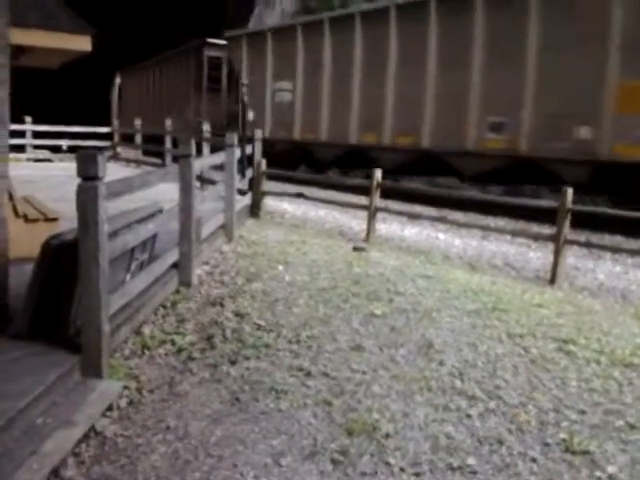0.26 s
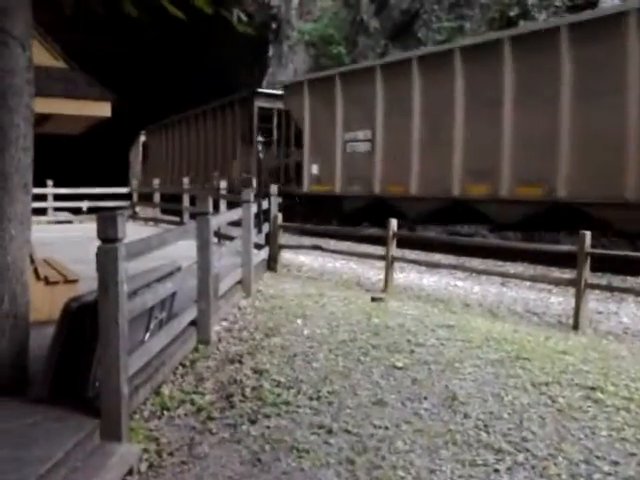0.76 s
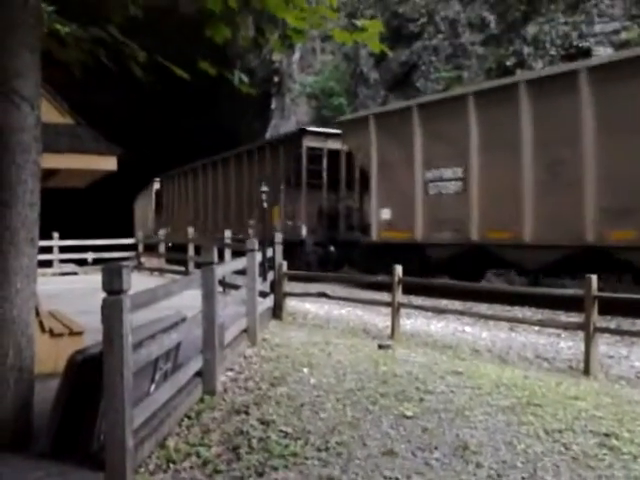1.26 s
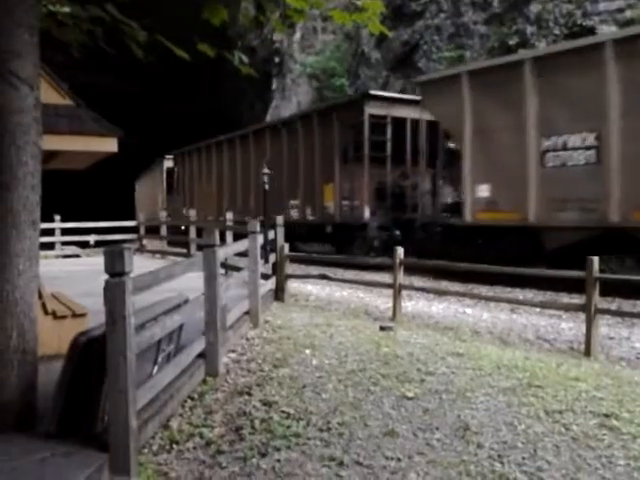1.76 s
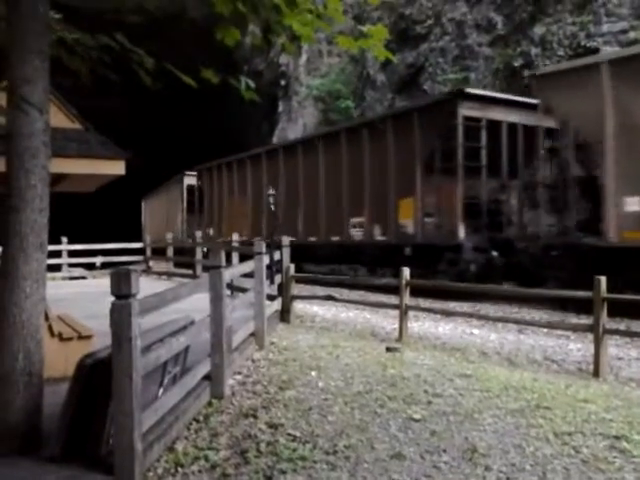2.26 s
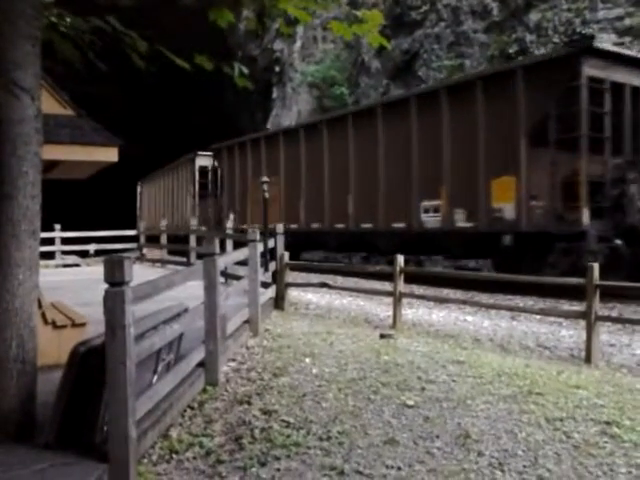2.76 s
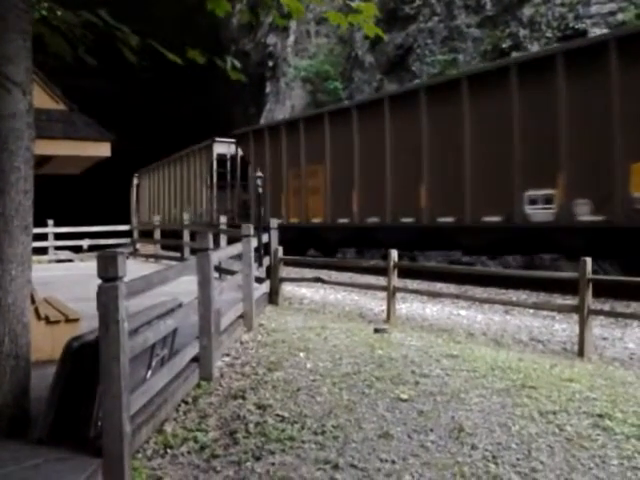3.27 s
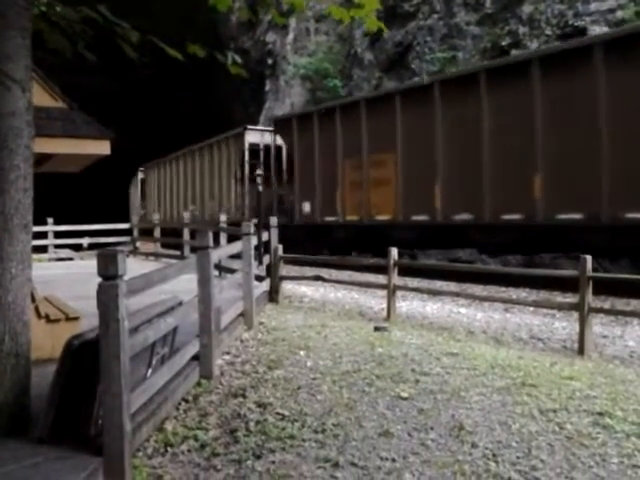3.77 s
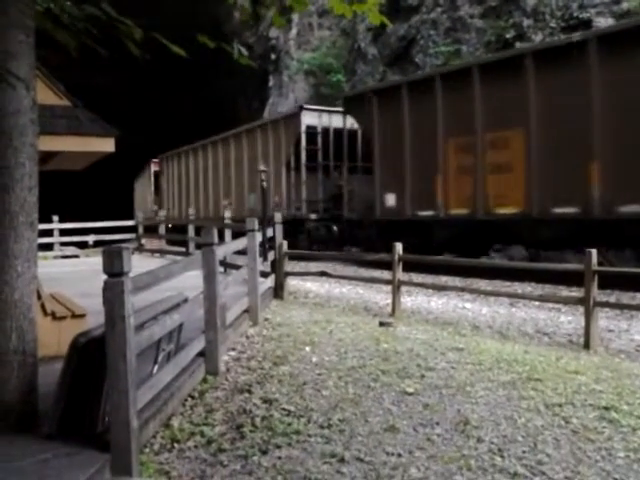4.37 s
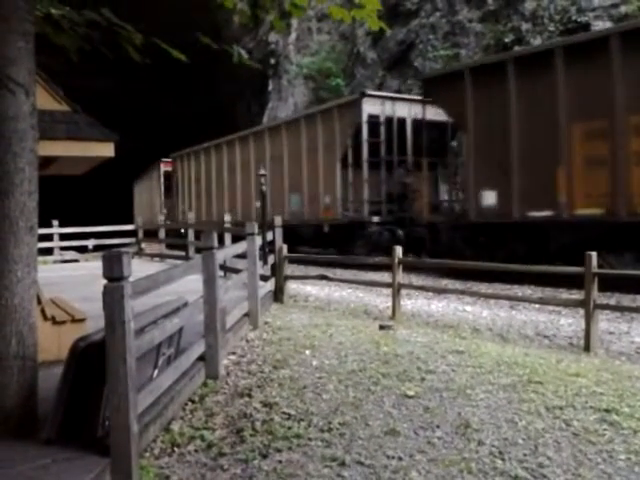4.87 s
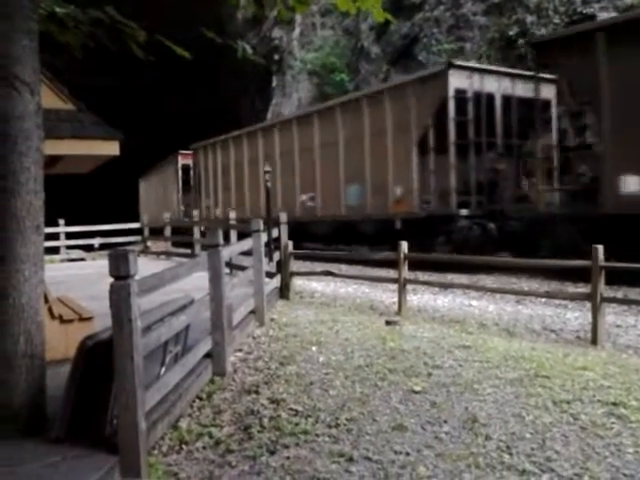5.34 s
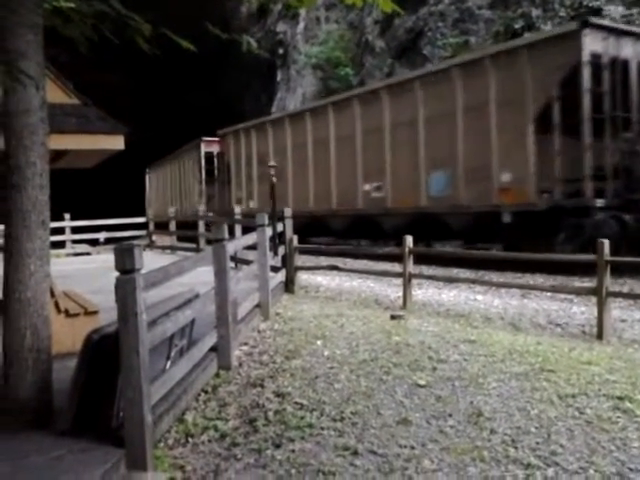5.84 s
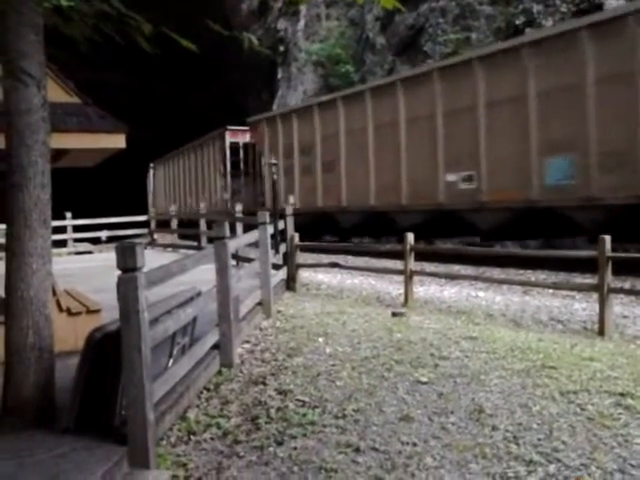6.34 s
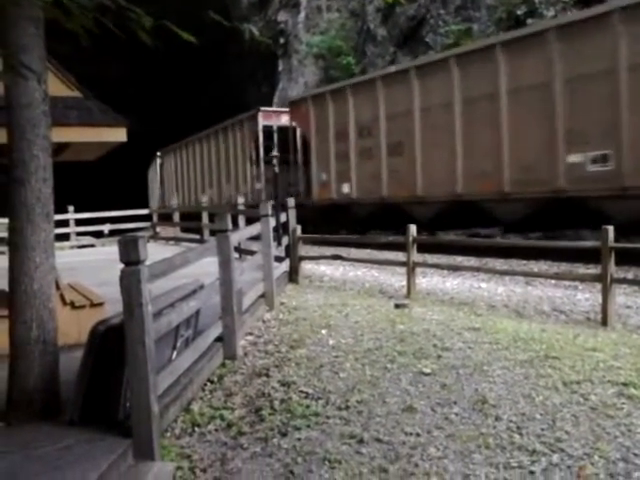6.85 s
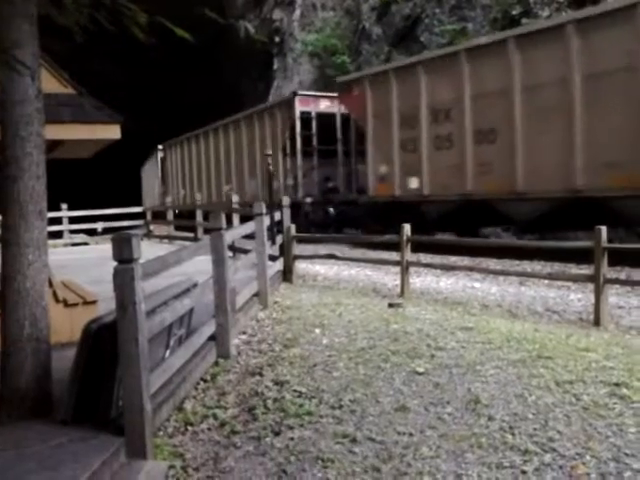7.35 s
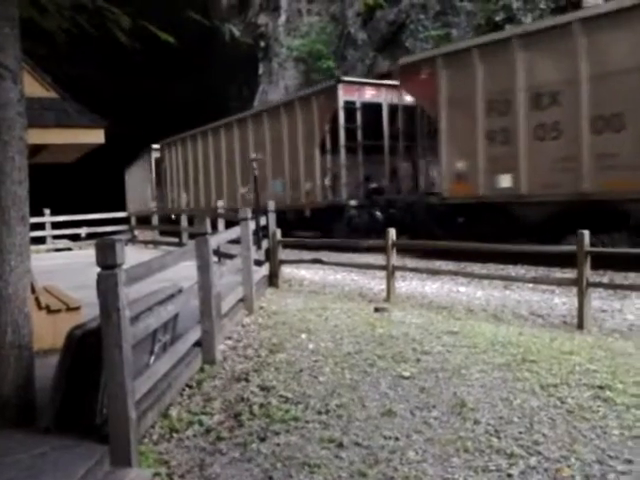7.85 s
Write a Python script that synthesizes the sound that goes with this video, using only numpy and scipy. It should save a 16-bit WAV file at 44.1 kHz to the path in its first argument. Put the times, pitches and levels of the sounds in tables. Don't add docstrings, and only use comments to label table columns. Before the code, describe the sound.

Heavy freight cars roll by very near a small mono microphone. Piercing steel-on-steel squeals clip the input at first, layered with gritty hiss, mid-heavy rail roar and rough car-body groans. Successive wheels catch and let go with clustered high tones. The second half is quieter: weak singing, a short steady squeal, thin whistles, then a wide fluttering squeal, with low air puffs.

```python
import sys
import numpy as np
from scipy import signal
from scipy.fft import rfft, irfft, next_fast_len
from scipy.io import wavfile

SR = 44100
rng = np.random.default_rng(int(sys.argv[2]) if len(sys.argv) > 2 else 0)


def wrap_up_sound(samples):
    columns = np.atleast_2d(samples).T
    tamed = np.clip(columns, -1, 1)
    steps = np.round(tamed * 32767).astype(np.int16)
    wavfile.write(sys.argv[1], SR, steps)


def invert_db(level):
    return 10 ** (np.asarray(level, dtype=float) / 20)


N = 357651
SECONDS = np.arange(N) / SR
PASSING_GLIDE_PER_S = -.0055
FADE_DB_PER_S = -0.97
BREEZE_FROM_S = 4.1
TOUCH_EDGE_S = .01


def in_time(rows):
    s, *columns = np.transpose(rows)
    return [np.interp(SECONDS, s, c) for c in columns]


def rms_one(x):
    return x / np.sqrt(np.mean(x ** 2) + 1e-20)


def drift(rate_hz, size=N):
    step = 40
    r = np.exp(-2 * np.pi * rate_hz * step / SR)
    coarse = rng.standard_normal(size // step + 1002)
    slow = signal.lfilter([1], [1, -2 * r, r * r], coarse)[500:]
    return np.interp(np.arange(size) / step, np.arange(len(slow)), rms_one(slow))


def held(start, length, attack, release, t=SECONDS):
    rise = (t - start) / attack
    fall = (start + length - t) / release + .5
    return np.clip(np.minimum(rise, fall), 0, 1) ** 2


def fade(t, start, end, edge):
    return np.sin(np.pi / 2 * np.clip(np.minimum(t - start, end - t) / edge, 0, 1)) ** 2


def touches_db(rows):
    return sum(db * held(s, length, TOUCH_EDGE_S, TOUCH_EDGE_S) for s, length, db in rows)


def sing(hz, width_hz, rough):
    rough = np.clip(rough, 0, 1)
    flutter = (drift(width_hz, size=len(hz)) + 1j * drift(width_hz, size=len(hz))) / np.sqrt(2)
    swing = np.exp(2j * np.pi * np.cumsum(hz) / SR)
    return np.sqrt(2) * np.real(swing * (np.sqrt(1 - rough ** 2) + rough * flutter))


def squeaks(rows, rough=0.62):
    out = np.zeros(N)
    for middle, length, hz, db, width_hz in rows:
        span = slice(max(int((middle - length / 2) * SR), 0), int((middle + length / 2) * SR))
        t = SECONDS[span] - middle
        swell = fade(t, -length / 2, length / 2, 0.26 * length)
        out[span] += invert_db(db) * swell * sing(hz * (1 + PASSING_GLIDE_PER_S * t), width_hz, rough)
    return out


# pitch_hz, width_hz, lift_db
RIM_BANDS = [(1706, 11, 5.5), (1950, 48, -0.5), (2580, 20, 3.5), (2980, 32, 5), (3450, 21, 7.5),
             (4460, 200, 9.5), (5374, 164, 8), (6410, 250, 7), (7150, 230, 0.5), (8100, 160, 1.5),
             (9230, 180, 4)]


def patchy_noise(spectrum, count, patchy_db, together_db):
    size = next_fast_len(N)
    log_hz = np.log(np.arange(1, size // 2 + 2) * SR / size)
    points, level_db = np.log(np.array(spectrum)[:, 0]), np.array(spectrum)[:, 1]
    shape = invert_db(np.interp(log_hz, points, level_db, left=-99, right=-99))
    coloured = rfft(rng.standard_normal(size)) * shape
    for hz, width_hz, lift_db in RIM_BANDS:
        near = slice(int((hz - 3 * width_hz) * size / SR), int((hz + 3 * width_hz) * size / SR))
        bump = np.exp(-2 * ((np.exp(log_hz[near]) - hz) / width_hz) ** 2)
        coloured[near] *= invert_db(lift_db * bump)
    place = (log_hz - points[0]) / (points[-1] - points[0]) * (count - 1)
    out = np.zeros(N)
    for k in range(count):
        band = irfft(coloured * np.clip(1 - abs(place - k), 0, 1), size)[:N]
        out += invert_db(patchy_db * drift(8.1)) * band
    return rms_one(out * invert_db(together_db * drift(36)))


# first_heard_s, last_heard_s
PASSES = [
    (0, 2.45),
    (2.4, 4.5),
    (4.35, 5.55),
    (5.6, 7.0),
    (6.8, 8.11),
]
CATCH_S, LET_GO_S, SURGE_DB, SURGE_HZ = .06, .14, 1.0, 16
WAVER_SHARE, WAVER_HZ = .0015, 9
ROUGHER_PER_DB = .035


def wheel(catches, modes, turn):
    heard = PASSES[turn]
    out = np.zeros(N)
    span = (SECONDS >= heard[0] - .7) & (SECONDS <= heard[1] + .2)
    t = SECONDS[span]
    glide = 1 + PASSING_GLIDE_PER_S * (t - np.mean(heard))
    for (hz, width_hz, rough, trim_db), rows in zip(modes, catches):
        power = sum((invert_db(db) * held(s, length, CATCH_S, LET_GO_S, t)) ** 2 for s, length, db in rows)
        grip = (np.sqrt(power) + 1e-5) * invert_db(SURGE_DB * drift(SURGE_HZ, size=len(t)))
        rough = rough + ROUGHER_PER_DB * 20 * np.log10(grip.max() / grip)
        pitch_hz = hz * (glide + WAVER_SHARE * drift(WAVER_HZ, size=len(t)))
        out[span] += grip * invert_db(trim_db) * sing(pitch_hz, width_hz, rough)
    return out


# start_s, length_s, level_db
WHEEL_1_LEAD = [
    [(-.2, 1.02, -15), (.3, .2, -17), (.8, .95, -20), (1.72, .6, -26)],
]
WHEEL_1 = [
    [(-.1, 2.1, -22.5), (.5, .5, -24), (1.75, 0.48, -21)],
    [(-.1, 2.2, -18.5), (.05, 0.18, -16), (.68, 0.32, -13.5), (1.1, 0.65, -20)],
    [(-.1, 2.2, -27), (2.0, .45, -31), (.7, 0.22, -26), (.92, 0.64, -20), (1.5, 0.38, -21.5)],
]
WHEEL_1_LOW = [
    [(-.1, .6, -28), (1.05, .4, -35), (1.48, .3, -25), (1.85, .5, -35)],
    [(.4, .35, -35), (1.0, .5, -29), (1.48, .2, -28), (1.63, .3, -24)],
]
# mid_pass_pitch_hz, flutter_width_hz, rough_share (0-1), trim_db
MODES_1_LEAD = [(6194, 45, .15, 1)]
MODES_1 = [(7125, 35, .6, -1), (8060, 40, .6, -2), (13545, 60, .75, -1)]
MODES_1_LOW = [(4317, 30, .45, 0), (5256, 22, .35, 1)]
# start_s, length_s, level_db
SLIPS = [
    (.07, .05, -4),
    (.525, .035, -14),
    (.79, .03, -10),
    (.915, .025, -10),
]


def first_wheel():
    lead = invert_db(touches_db(SLIPS)) * wheel(WHEEL_1_LEAD, MODES_1_LEAD, 0)
    return lead + wheel(WHEEL_1, MODES_1, 0) + wheel(WHEEL_1_LOW, MODES_1_LOW, 0)


# time_s, level_db
ROLL = [(0.0, -24), (0.31, -23.5), (0.95, -23.5), (1.6, -27), (2.1, -22.5), (2.46, -24.5), (2.73, -22.5),
        (5.31, -28), (5.49, -29.5), (6.62, -28), (7.16, -25), (8.11, -27)]


def truck_weight_db():
    weight_db = in_time(ROLL)[0]
    return weight_db - weight_db.mean()


# pitch_hz, level_db_per_hz
DULL = [(2400, -2.5), (3000, -1), (4000, -2.5), (4500, -8), (5000, -2.5), (6000, -6), (6800, 1.5),
        (7500, -3)]
BRIGHT = [(6000, -11.5), (6700, -15.5), (7200, 0.5), (7700, 1.5), (8200, 4), (8800, 1), (9300, -2),
          (10000, -3), (11000, -2.5), (12300, -7), (13800, -50)]
TOP = [(11000, -30), (12300, 0), (13500, -.5), (14500, -1), (15600, -1.5), (16000, -2)]
# time_s, level_db
RUB = [(0, -17), (.62, -19.5), (.72, -12), (2.45, -12), (2.6, -14.5), (3.4, -13.5), (3.6, -12), (4.1, -13),
       (4.25, -17.5), (5.0, -16.5), (6.2, -17.5), (6.7, -16), (7.3, -17.5), (7.45, -15.5), (8.11, -17.5)]
# start_s, length_s, lift_db
STUTTERS = [
    (.06, .07, 5),
    (.15, .1, 5),
    (.262, .055, 5),
    (.355, .075, 3),
    (.515, .06, 7),
    (.6, .035, 3),
]
DULL_DB, TOP_DB, TOP_FOLLOWS = -22, -25, 0.32
DRAW_AWAY_S, DRAW_AWAY_LENGTH_S, DRAW_AWAY_DB = 4.03, .15, -3


def grinding():
    since_s = SECONDS - DRAW_AWAY_S
    dull_db = DULL_DB + truck_weight_db() + DRAW_AWAY_DB * np.clip(since_s / DRAW_AWAY_LENGTH_S, 0, 1)
    dull_db += FADE_DB_PER_S * np.maximum(since_s, 0)
    rub_db = in_time(RUB)[0] + touches_db(STUTTERS)
    top_db = TOP_DB + TOP_FOLLOWS * (rub_db - rub_db.mean())
    dull = patchy_noise(DULL, count=10, patchy_db=1.32, together_db=.5)
    bright = patchy_noise(BRIGHT, count=14, patchy_db=1.2, together_db=.9)
    top = patchy_noise(TOP, count=6, patchy_db=1.3, together_db=0.9)
    return invert_db(dull_db) * dull + invert_db(rub_db) * bright + invert_db(top_db) * top


# pitch_hz, level_db_per_hz
RUMBLE = [(18, -73), (30, -43), (59, -32), (129, -6.5), (334, -8), (372, -6), (649, -10.5), (743, -17),
          (814, -12.5), (891, -15), (1100, -13.5), (1430, -20), (2420, -120)]
ROAR = [(350, -17), (600, -8.5), (816, -7.5), (1150, -6.5), (1770, -0.5), (2150, 0.5), (2310, -3),
        (2630, -2), (3220, -22.5), (3600, -17), (4680, -14), (7920, -120)]
ROAR_DB, RUMBLE_DB, RUMBLE_FOLLOWS = -25.5, -38, 0.68
RUMBLE_RETURNS_DB = 2.5


def rolling():
    weight_db = truck_weight_db()
    rumble = patchy_noise(RUMBLE, count=8, patchy_db=3.0, together_db=2.5)
    roar = patchy_noise(ROAR, count=12, patchy_db=1.53, together_db=.5)
    rumble_db = RUMBLE_DB + RUMBLE_FOLLOWS * weight_db
    rumble_db = rumble_db + RUMBLE_RETURNS_DB * held(BREEZE_FROM_S, 9, 0.17, .1)
    return invert_db(rumble_db) * rumble + invert_db(ROAR_DB + weight_db) * roar


# middle_s, length_s, pitch_hz, level_db
SQUEAKS = [(.15, .3, 1710, -33), (.92, .75, 1700, -36), (1.18, .25, 3410, -26), (1.4, 1.3, 2545, -33),
           (1.45, .79, 937, -33), (2.76, .36, 3492, -21), (2.6, 1.2, 2575, -31), (2.88, .25, 1720, -28),
           (3.3, 1.1, 3485, -30), (4.14, .13, 3450, -31), (4.0, 1.1, 2560, -32), (4.2, .31, 955, -37),
           (5.2, .35, 2940, -41), (5.4, 1.4, 2580, -38), (5.7, 2.6, 334, -46), (7.2, 1.1, 336, -44),
           (7.6, 1.5, 835, -44), (7.87, .4, 2175, -33)]
HIGH_SQUEAKS = [(0.651, 1.3, 9110, -25), (0.801, .25, 8700, -21), (2.4, 0.73, 5290, -25),
                (2.92, 0.23, 15400, -34), (1.5, 1.14, 4350, -33.5), (3.35, .23, 12400, -33),
                (6.6, 0.6, 7000, -34), (7.18, 0.46, 5380, -33.5), (7.47, .15, 5500, -32),
                (7.52, 1.3, 4520, -40), (7.7, .8, 8400, -28), (7.9, .66, 6580, -30), (4.35, .35, 7500, -31)]
LOW_FLUTTER_HZ, HIGH_FLUTTER_HZ = 17, 42


def short_squeaks():
    low = [(*row, LOW_FLUTTER_HZ) for row in SQUEAKS]
    high = [(*row, HIGH_FLUTTER_HZ) for row in HIGH_SQUEAKS]
    return squeaks(low + high)


# middle_s, length_s, pitch_hz, level_db, flutter_width_hz
GROANS = [
    (3.24, .32, 2050, -25, 230),
    (.55, 2.2, 850, -33, 200),
    (2.3, .6, 1950, -31, 120),
    (6.85, .3, 330, -41, 60),
]


def groans():
    return squeaks(GROANS, rough=0.98)


def far_wheels(count, low_hz, high_hz, db):
    when, length, pitch, strength = rng.random((count, 4)).T
    hz = low_hz * (high_hz / low_hz) ** pitch
    return squeaks(zip(when * N / SR, .12 + .3 * length, hz, db - 6 * strength, .005 * hz))


# start_s, length_s, level_db
PUFFS = [
    (-.05, 0.11, -58),
    (4.1, 0.37, -52),
    (4.897, .15, -62),
    (5.22, 0.13, -61),
    (6.8, 0.24, -60),
    (7.1, 0.17, -54),
    (7.78, .4, -57),
]
BREEZE_DB, BREEZE_LIFT_DB, PUFF_LOW_HZ, PUFF_HIGH_HZ = -73, 7, 95, 200


def air():
    band = signal.butter(2, [PUFF_LOW_HZ, PUFF_HIGH_HZ], "band", fs=SR, output="sos")
    low = signal.sosfilt(band, rng.standard_normal(N))
    push = invert_db(BREEZE_DB + BREEZE_LIFT_DB * held(BREEZE_FROM_S, 9, .1, .1))
    push = push + sum(invert_db(db) * held(s, length, 0.086, .09) for s, length, db in PUFFS)
    return rms_one(low * invert_db(4.0 * drift(14))) * push


# start_s, length_s, level_db
WHEEL_2 = [
    [(1.75, .55, -19), (2.7, .15, -12), (2.68, .2, -29), (2.2, 1.65, -18.5), (3.5, 0.16, -12)],
    [(2.05, 0.31, -15), (2.45, 0.3, -12.5), (2.75, 1.48, -22.5), (3.25, 0.3, -16.5)],
    [(1.9, 2.3, -23), (2.95, 0.26, -17), (3.3, 0.36, -14.5)],
]
WHEEL_2_LOW = [
    [(2.63, 0.3, -22), (2.9, 0.41, -20), (3.58, 0.37, -24), (4.0, 0.17, -21.5), (4.2, 0.12, -27),
     (2.5, 1.8, -30)],
    [(2.5, 0.16, -15.5), (2.65, 0.34, -24.5), (3.35, 0.31, -22.5), (2.8, 1.1, -33)],
]
# mid_pass_pitch_hz, flutter_width_hz, rough_share (0-1), trim_db
MODES_2 = [(8249, 55, .7, 0), (7289, 40, .45, 0), (9160, 40, .5, -1)]
MODES_2_LOW = [(5350, 30, .35, 1), (6310, 30, .35, 1)]


def second_wheel():
    return wheel(WHEEL_2_LOW, MODES_2_LOW, 1) + wheel(WHEEL_2, MODES_2, 1)


# start_s, length_s, level_db
WHEEL_3 = [
    [(4.52, .83, -32), (4.8, .2, -35), (4.4, .2, -40)],
    [(4.85, .33, -26), (4.4, .4, -34)],
]
# mid_pass_pitch_hz, flutter_width_hz, rough_share (0-1), trim_db
MODES_3 = [(6470, 56, 0.82, 8.5), (9430, 35, .55, -1)]


def third_wheel():
    return wheel(WHEEL_3, MODES_3, 2)


# middle_s, length_s
SPELLS = [
    (5.57, .7),
    (6.12, .7),
    (6.62, .6),
    (7.2, .9),
]
# pitch_hz, level_db
WHISTLES_1 = [(10745, -39), (12570, -45), (13577, -40), (14303, -46), (15084, -46)]
WHISTLES_2 = [(10610, -39), (11316, -41), (11822, -42), (12915, -38), (13544, -41), (14260, -42),
              (14540, -41), (15041, -35), (15219, -42)]
WHISTLES_3 = [(9905, -33), (10600, -40), (10864, -39), (11300, -40), (11736, -39), (12258, -40),
              (13480, -42), (14982, -40), (15461, -42)]
WHISTLES_4 = [(9900, -41), (10578, -41), (10831, -39), (11730, -43), (12796, -45), (15100, -46)]


def whistles(lift_db):
    rows = []
    for (middle, length), lines in zip(SPELLS, [WHISTLES_1, WHISTLES_2, WHISTLES_3, WHISTLES_4]):
        rows += [(middle, length, hz, db + lift_db, 22) for hz, db in lines]
    return squeaks(rows)


# start_s, length_s, level_db
WHEEL_4 = [
    [(6.27, .3, -17), (6.57, .2, -25), (5.9, .35, -28)],
    [(6.6, .2, -22)],
    [(5.85, .4, -30), (6.5, .3, -33)],
]
# mid_pass_pitch_hz, flutter_width_hz, rough_share (0-1), trim_db
MODES_4 = [(8062, 25, .35, 0), (8995, 35, .6, -4), (15030, 25, .4, -2)]


def fourth_wheel():
    return wheel(WHEEL_4, MODES_4, 3)


# start_s, length_s, level_db
WHEEL_5 = [
    [(6.85, .4, -31), (7.15, .4, -23.5), (7.35, 1.0, -20.5)],
    [(7.34, .3, -24), (7.7, .5, -29)],
    [(7.35, .2, -21), (7.6, .5, -36)],
]
# mid_pass_pitch_hz, flutter_width_hz, rough_share (0-1), trim_db
MODES_5 = [(6290, 95, .6, -1.5), (7400, 94, 1, 3), (9440, 50, .71, -3)]


def fifth_wheel():
    return wheel(WHEEL_5, MODES_5, 4)


def scene():
    mono = first_wheel() + grinding() + rolling() + short_squeaks() + groans()
    mono += far_wheels(count=60, low_hz=1400, high_hz=2800, db=-39)
    mono += far_wheels(count=80, low_hz=7000, high_hz=12000, db=-36)
    mono += second_wheel() + third_wheel() + whistles(lift_db=2.5) + fourth_wheel() + fifth_wheel()
    return np.array([mono, mono])


# time_s, ceiling (0-1)
CEILING = [(0, .42), (2.0, .45), (4.05, .47), (4.25, .62), (8.11, .62)]
KNEE = 6


def overload(x):
    return x / (1 + abs(x / in_time(CEILING)[0]) ** KNEE) ** (1 / KNEE)


def stray_treble(mono, count):
    side = np.zeros(N)
    size = 2048
    for when, pitch in rng.random((count, 2)):
        at, low_hz = int(size + when * (N - 3 * size)), 4500 + 8500 * pitch
        band = signal.butter(4, [low_hz, low_hz + 2000], "band", fs=SR, output="sos")
        side[at:at + size] += 0.36 * np.hanning(size) * signal.sosfilt(band, mono[at - size:at])
    return side * [[1], [-1]]


def low_pass(x):
    return signal.sosfilt(signal.butter(12, 17090, fs=SR, output="sos"), x)


BASS_CUT_HZ, TOP_CUT_HZ = 226, 15740


def record(dry):
    bass_cut = signal.butter(6, BASS_CUT_HZ, "high", fs=SR, output="sos")
    heard = signal.sosfilt(bass_cut, overload(1.125 * dry[0])) + air()
    size = next_fast_len(N)
    hz = np.arange(size // 2 + 1) * SR / size
    cut = irfft(rfft(heard, size) * (hz < TOP_CUT_HZ), size)[:N]
    return low_pass(cut + stray_treble(cut, count=36))


dry = scene()
out = record(dry)
wrap_up_sound(out)
```